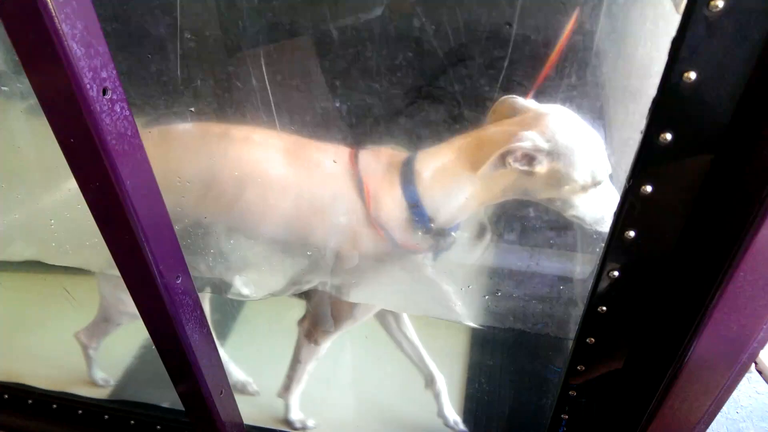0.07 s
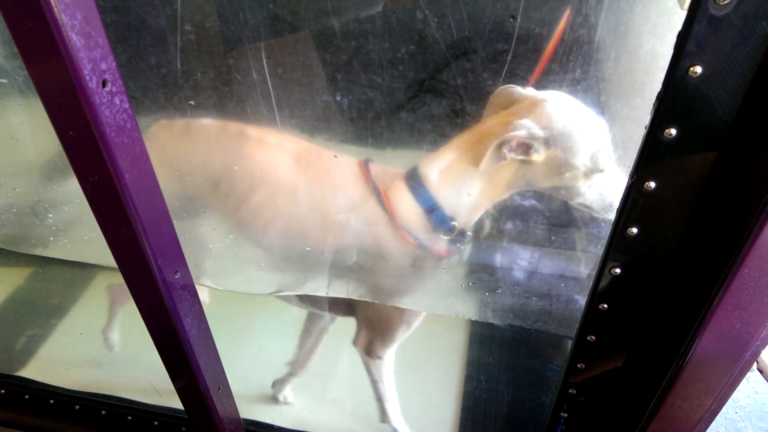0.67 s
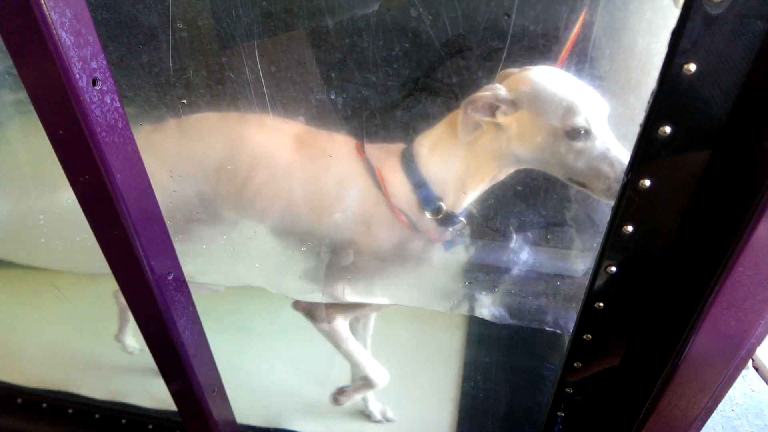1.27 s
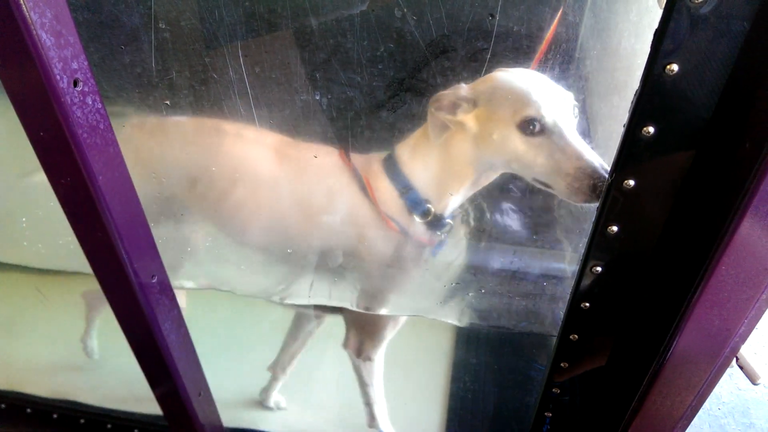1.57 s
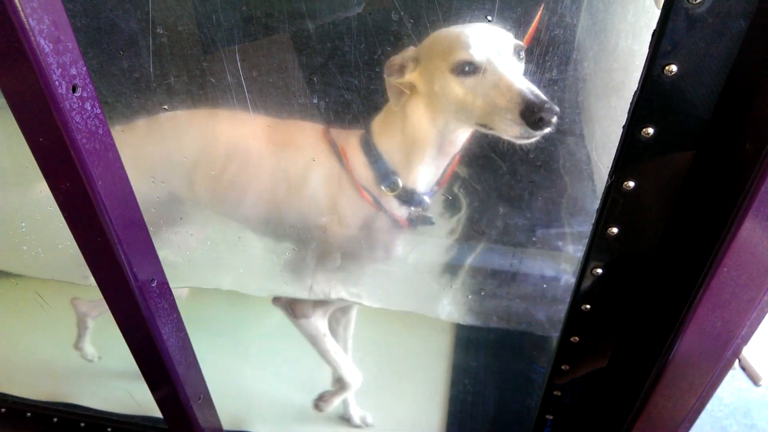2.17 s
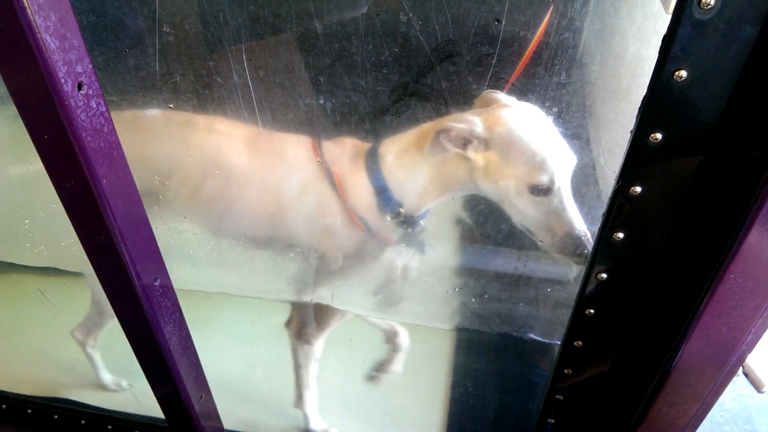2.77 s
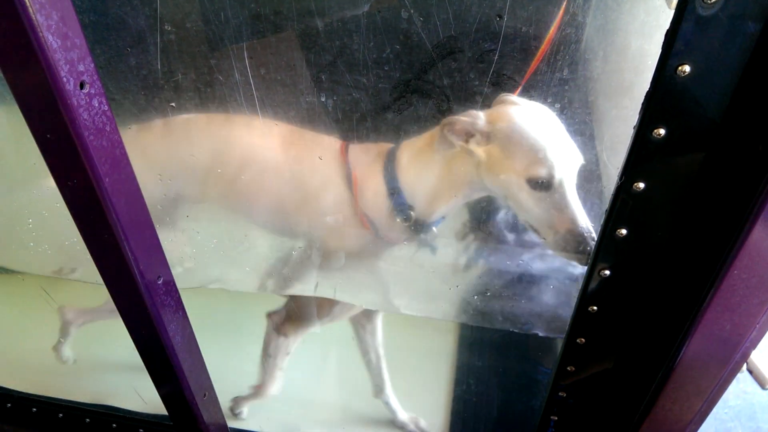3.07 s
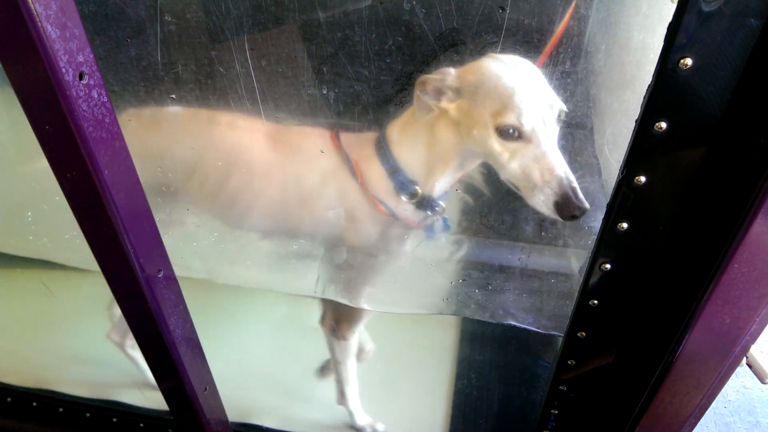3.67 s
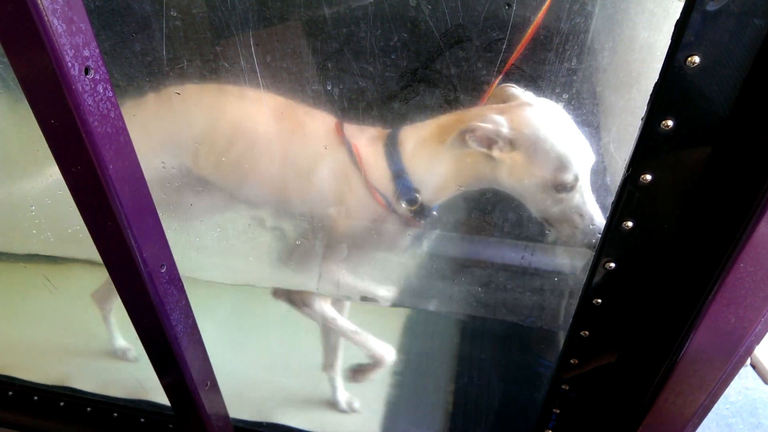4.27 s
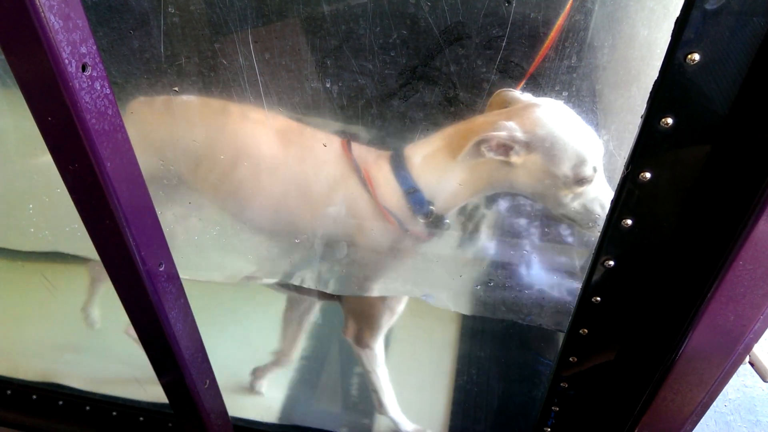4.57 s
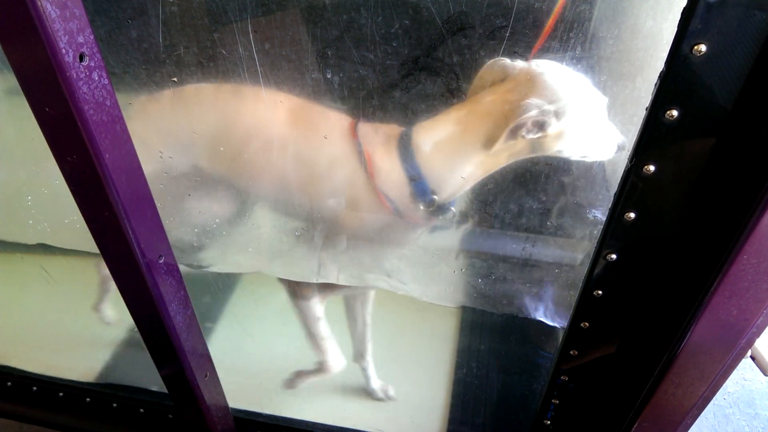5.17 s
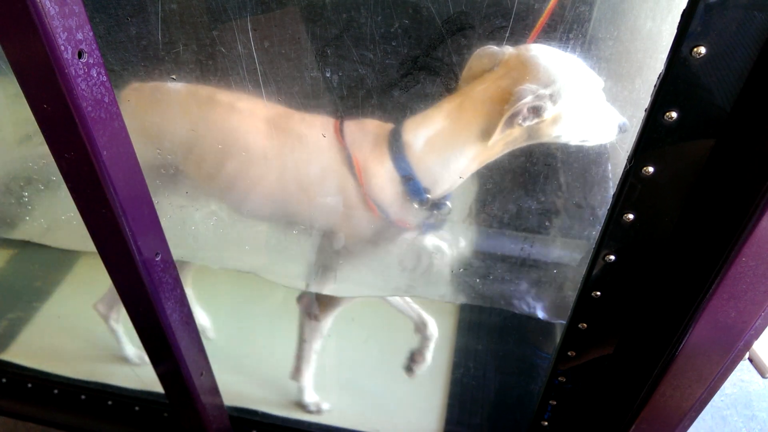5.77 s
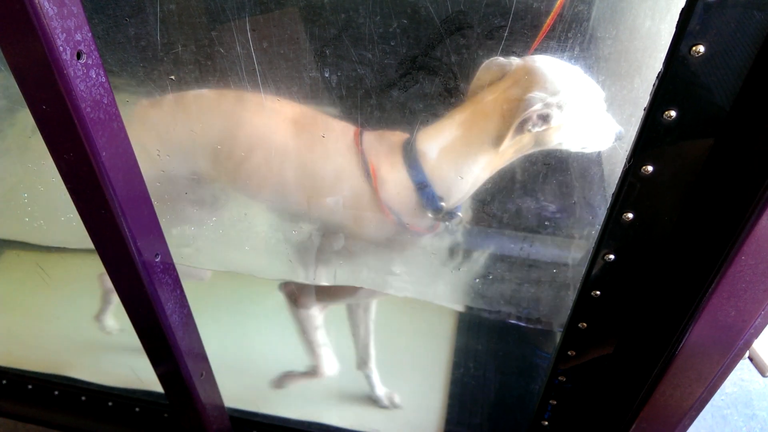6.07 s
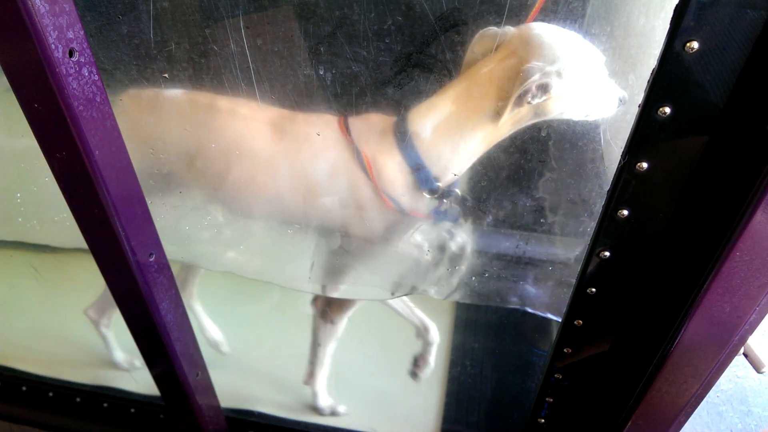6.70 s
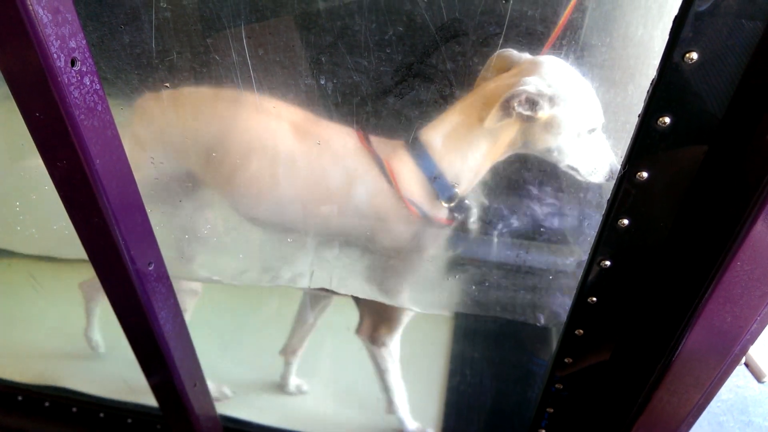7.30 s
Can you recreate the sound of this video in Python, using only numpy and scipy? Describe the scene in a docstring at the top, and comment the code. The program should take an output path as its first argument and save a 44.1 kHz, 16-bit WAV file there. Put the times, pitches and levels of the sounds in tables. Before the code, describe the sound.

A dog's underwater treadmill runs in a hard-walled room. A steady low motor and pump hum fades in with an even, hissing rush of circulating water and a faint high whine. The belt rubs on its roller in a low growl, three to four times a second. Moving air buffets the close microphone with irregular low bumps, mostly on the left. Two very faint splashes come near the end.

```python
"""A hum of motor and pump over an even rush of circulating water fades in together: a small dog's underwater
treadmill, running in a hard-walled room. Each shaft sounds harmonics of its rotation rate, and the geared-down
roller growls once a turn as the belt drags on it. Moving air buffets each microphone port on its own, with low
bumps. Two faint splashes come near the end."""
import sys
import numpy as np
from scipy import signal
from scipy.fft import rfft, irfft
from scipy.io import wavfile

SR = 44100
rng = np.random.default_rng(int(sys.argv[2]) if len(sys.argv) > 2 else 0)


def materialize(psi):
    """Save the field psi as 16-bit PCM at rate SR to the path in sys.argv[1].

    A 1-D psi becomes a single channel; in a 2-D psi each row is a channel.
    """
    bounded = np.clip(np.atleast_2d(psi).T, -1, 1)
    quanta = np.round(bounded * 32767).astype(np.int16)
    wavfile.write(sys.argv[1], SR, quanta)


N = 332514
TIME = np.arange(N) / SR
BIN_HZ = np.maximum(np.arange(N // 2 + 1) * SR / N, 1)

# Hum of the drive motor and of the pump; levels in all tables are relative. Each row: multiple of
# the shaft rate, level in dB, left minus right in dB, phase lead of the left in radians.
MOTOR_HARMONICS = [(6, -48, 2, 0), (12, -55, -3, -0.5), (15, -49.5, -2, 0.53), (20, -57.5, -5, 1.5),
                   (21, -55.5, -6, -2), (24, -62, -22.5, 2), (27, -59, -8, -1), (30, -59.5, -6, 2.5),
                   (45, -66, -8, 4.5), (54, -71, -19, 0)]
PUMP_HARMONICS = [(4, -42, -3, 0.16), (5, -58.5, -9, .3), (7, -52, -2, 1.2), (8, -55, 0, 1.5),
                  (9, -53.5, -1.5, 1), (11, -71, 4, 0.89), (16, -61, -5, 2.7)]
# Tones of the motor and its controller. Each row: frequency in Hz, level in dB, left minus right in dB.
WHINE_TONES = [(530, -55, -3), (3945, -62, -5), (14018, -76, -8), (14411, -73, -8), (14804, -77, -8)]
# Noise spectra of machine, water, belt and air. Each row: frequency in Hz, spectral density in dB.
RUMBLE_SPECTRUM = [(40, -11.5), (80, -4.5), (146, -2.5), (161, 3.5), (195, -20), (265, -6), (310, -3.5),
                   (390, -8), (460, -4.5), (620, -14.5), (820, -19), (995, -11.5), (1055, -26), (1170, -20),
                   (1500, -43)]
RUSH_SPECTRUM = [(40, -7), (150, -14), (400, -15), (750, -6.5), (1150, 3), (1500, -2), (2700, -1.5),
                 (3800, -6), (5800, -5.5), (6300, -10), (7300, -11.5), (8700, -18.5), (12500, -17),
                 (15500, -23)]
RUB_SPECTRUM = [(130, -33), (190, -4.5), (250, -1.5), (310, 4), (380, 4.5), (460, -3.5), (560, -9),
                (900, -12.5), (1200, -13.5), (2000, -45)]
BUFFET_SPECTRUM = [(12, -32), (25, -17), (45, -4.5), (80, 2), (135, -2), (200, -6.5), (300, -12),
                   (450, -19), (700, -26), (1500, -77)]
# Narrow resonances of the flow. Each row: centre in Hz, width in Hz, first level in dB, last level in dB.
FLOW_RESONANCES = [(4220, 30, -67, -67), (4430, 35, -62, -63), (4870, 25, -65, -66), (4965, 60, -64, -64),
                   (5078, 65, -57, -59.5), (5185, 25, -66, -66), (5300, 25, -63.5, -64.5),
                   (5640, 80, -58, -62.5), (5730, 95, -55, -61), (5850, 70, -64, -69),
                   (6610, 60, -64, -65.5), (6820, 45, -68, -69), (7065, 40, -64.5, -66.5),
                   (7250, 130, -61.5, -63.5), (7784, 60, -68, -70), (8230, 200, -68, -69),
                   (11990, 100, -72, -72)]
# The belt's drag, once a turn. Each row: time in seconds, strength in dB, pitch of the growl in Hz.
BELT_DRAGS = [(.04, -2, 150), (.328, -2, 141.2), (.596, -0.5, 155.1), (.89, 0, 142.4), (1.146, -0.5, 157),
              (1.434, -2, 161.6), (1.69, -1.5, 139.4), (1.983, -0.5, 155), (2.263, 0, 145.3),
              (2.525, 1.5, 151), (2.812, -0.5, 145.8), (3.072, -1, 151.8), (3.38, .5, 153.4),
              (3.624, 0, 149), (3.923, 2, 150.3), (4.201, -2, 139.6), (4.478, 0, 156), (4.758, -4, 137.3),
              (5.031, 0.5, 153.3), (5.33, 2, 150), (5.577, 1, 153), (5.864, .5, 154), (6.15, -1.5, 142.3),
              (6.416, 1, 154), (6.706, -1, 142.7), (6.965, 3.5, 158.2), (7.249, 1, 154.3), (7.535, -3, 145)]
# The growl's first three harmonics. Each row: peak level in dB, delay after the drag in turns,
# half-width in turns, dB gained per Hz of pitch.
GROWL_HARMONICS = [(-32.5, -0.025, 0.19, 0.17), (-33, 0.022, 0.15, -0.14), (-44, .03, 0.15, 0)]
# Gusts on the ports. Each row: centre in seconds, half-length in seconds, left and right levels in dB.
AIR_GUSTS = [(0.985, 0.037, -31, -36), (1.275, 0.028, -32, -46), (1.726, 0.12, -33.5, -43),
             (2.474, 0.12, -29.5, -38), (2.79, 0.05, -25, -30), (3.044, 0.035, -29.5, -28),
             (3.357, 0.029, -26.5, -34), (4.44, 0.03, -26, -34), (4.694, .11, -33, -34),
             (5.32, 0.11, -30, -33), (5.696, .018, -24, -43), (5.951, 0.086, -27.5, -35),
             (6.124, 0.08, -35.5, -33), (6.557, 0.05, -32, -41), (6.66, 0.045, -31.5, -30),
             (6.95, 0.082, -31.5, -36), (7.186, 0.16, -44, -34), (7.483, 0.042, -36, -33)]
# Low bumps of air. Each row: centre in seconds, level in dB, pitch in Hz, length in cycles,
# share in the right port from 0 to 1.
AIR_BUMPS = [(0.344, -22, 130, 1.5, 0), (0.893, -17.5, 181, 0.97, 0.03), (0.999, -16, 150, 1, 0),
             (1.238, -18, 190, .6, 0.03), (1.422, -15, 145, 0.51, 0.24), (1.65, -13, 148.1, 1.1, 0.09),
             (1.733, -13, 270, 0.4, 0), (1.786, -9.5, 190, 0.47, 0), (1.849, -12.5, 135, 0.69, 0.2),
             (2.222, -16, 150, .9, 0.02), (2.411, -15, 124, 0.82, 0), (2.518, -16, 216, 0.62, 0),
             (2.718, -12, 120, 0.42, 0), (2.794, -14.5, 207, 1.2, 0.9), (2.825, -8, 165, 0.46, 0),
             (2.858, -9.5, 210, .8, 0), (2.869, -0.5, 144, 0.82, 0.04), (3.05, -14, 129, 1.103, 0.2),
             (3.384, -15, 186.2, 0.53, 0), (4.039, -10, 115, 0.78, 0.04), (4.283, -12.5, 86.5, 0.62, 0),
             (4.44, -13, 165, 1.9, 0.2), (4.454, -9, 197.9, 0.34, 0), (5.082, -11, 151, 0.75, 0),
             (5.264, -7, 280, 0.55, 0), (5.312, -11, 157, 0.94, 0), (5.68, -13, 194.4, 0.45, 0),
             (5.692, -5.5, 116, 0.36, 0), (5.933, -11.5, 140, 1.1, 0), (5.987, -17, 215, 0.55, 0.1),
             (6.081, -11, 148, 0.83, 0.1), (6.204, -13.5, 135, 0.72, 1), (6.491, -9.5, 124, 0.72, 0),
             (6.653, -15.5, 140.9, 0.89, 0.98), (6.936, -10, 127.4, 0.56, 0.1), (6.984, -27, 120, 1.1, 0),
             (7.206, -13, 130, 0.79, 0.7), (7.272, -12.5, 193.8, 0.74, .7)]
# Spray at the water line. Each row: time in seconds, band centre in Hz, bandwidth in Hz,
# half-length in seconds, level in dB.
SPRAY_PUFFS = [(6.53, 4600, 1800, .04, -46), (7.203, 9850, 400, .016, -54)]
# Response of the muffled left port. Each row: frequency in Hz, gain against the right port in dB.
LEFT_PORT_RESPONSE = [(300, -0.5), (800, 0.5), (1200, -2.5), (1900, -0.5), (2400, -3.5), (2900, -3.5),
                      (3600, -3.5), (4500, -7.5), (5200, -15.5), (5800, -22), (6200, -33), (7200, -22),
                      (9500, -14), (12000, -19.5), (13500, -20), (15000, -35)]


def from_db(db):
    """Amplitude grows tenfold for every 20 dB."""
    return 10 ** (np.asarray(db) / 20)


def unit_rms(x):
    """Division by the root mean square gives unit power."""
    return x / np.sqrt(np.mean(x ** 2) + 1e-20)


def colour(x, spectrum):
    """Filtering multiplies the spectrum by a gain curve, here drawn through (Hz, dB) points."""
    hz, db = np.transpose(spectrum)
    return irfft(rfft(x) * from_db(np.interp(np.log(BIN_HZ), np.log(hz), db)), N)


def noise(spectrum, channels):
    """Filtered white noise of unit power, incoherent between channels."""
    return unit_rms(colour(rng.standard_normal((channels, N)), spectrum))


def drift(rate_hz):
    """A slow fluctuation of unit power: random values joined by straight lines."""
    return unit_rms(np.interp(TIME * rate_hz, np.arange(1024), rng.standard_normal(1024)))


def panned(db):
    """A level difference, split evenly between left and right, places a source to one side."""
    return from_db(np.array([[db / 2], [-db / 2]]))


def swell(turn, at, width):
    """A periodic envelope: one Gaussian hump of unit height per turn."""
    return np.exp(-(((turn - at + .5) % 1 - .5) / width) ** 2)


def shaft_hum(shaft_hz, harmonics, wander, waver_db):
    """Rotation radiates harmonics of the shaft rate; the room gives each its own side and phase."""
    angle = 2 * np.pi * np.cumsum(shaft_hz * (1 + wander * drift(7))) / SR
    hum = np.zeros((2, N))
    for multiple, db, pan_db, lead in harmonics:
        phase = multiple * angle + rng.uniform(0, 2 * np.pi) + np.array([[lead], [0]])
        amplitude = np.sqrt(2) * from_db(db + waver_db * drift(9))
        hum += amplitude * panned(pan_db) * np.sin(phase)
    return hum


def machine_rumble():
    """Irregular vibration of the machine radiates a continuous spectrum of low noise."""
    return from_db(-37.5) * noise(RUMBLE_SPECTRUM, channels=1)


def water_rush(flutter_db, direct_db, ripple_db, left_lead_s=.000272):
    """Flow noise arrives as a diffuse field plus a weaker direct wave that reaches the left port first."""
    direct = noise(RUSH_SPECTRUM, channels=1)[0]
    early = irfft(rfft(direct) * np.exp(2j * np.pi * BIN_HZ * left_lead_s), N)
    hiss = noise(RUSH_SPECTRUM, channels=2) + from_db(direct_db) * np.array([early, direct])
    # Faint resonances: a random gain about every 25 Hz, reaching full depth at 5 kHz.
    ripple = np.interp(BIN_HZ / 25.02, np.arange(1024), rng.standard_normal(1024))
    depth_db = ripple_db * np.minimum(BIN_HZ / 5000, 1)
    hiss = unit_rms(irfft(rfft(hiss) * from_db(depth_db * ripple), N))
    return from_db(-37 + flutter_db * drift(22)) * hiss


def flow_whistles():
    """Resonances select narrow bands of the flow noise; most of them slowly weaken."""
    power = 0
    for hz, width, first_db, last_db in FLOW_RESONANCES:
        peak = 1 / (1 + (2 * (BIN_HZ - hz) / width) ** 2) ** 2
        power = power + from_db([[first_db], [last_db]]) ** 2 * peak / peak.mean()
    flow = rfft(rng.standard_normal((2, N)))
    first, last = (irfft(flow * np.sqrt(p), N) for p in power)
    return from_db(4) * (first + (last - first) * TIME / TIME[-1])


def drive_whine(wander_hz=0.74):
    """The electric drive vibrates at nearly constant frequencies, each heard as a pure tone."""
    whine = np.zeros((2, N))
    for hz, db, pan_db in WHINE_TONES:
        phase = 2 * np.pi * np.cumsum(hz + wander_hz * drift(2.01)) / SR
        whine += np.sqrt(2) * from_db(db) * panned(pan_db) * np.sin(phase)
    return whine


def roller_growl(free_hz, catch_share, jitter, uneven_db, pan_db):
    """Periodic friction: once a turn the belt drags, lifting the pitch and adding overtones and a rub."""
    times, drag_db, drag_hz = np.transpose(BELT_DRAGS)
    turn = np.interp(TIME, times, np.arange(len(times)))
    nearest = np.round(turn).astype(int)
    load = from_db(drag_db[nearest] + uneven_db * drift(12))
    rise_hz = drag_hz[nearest] - free_hz
    # The pitch jumps as the belt catches, then settles on that turn's value.
    catch = catch_share * swell(turn, at=-0.18, width=.11)
    pitch = free_hz + rise_hz * (catch + swell(turn, at=0.045, width=.32))
    angle = 2 * np.pi * np.cumsum(pitch * (1 + jitter * drift(27.4))) / SR
    tone = from_db(-36.5) * swell(turn, at=0.52, width=0.22) * np.sin(angle)  # free hum between drags
    for multiple, (db, at, width, db_per_hz) in enumerate(GROWL_HARMONICS, 1):
        level = from_db(db + db_per_hz * (rise_hz - rise_hz.mean()))
        tone += level * load * swell(turn, at, width) * np.sin(multiple * angle)
    rub_envelope = from_db(-37.5) * load * swell(turn, at=-0.073, width=0.21)
    return panned(pan_db) * (np.sqrt(2) * tone + rub_envelope * noise(RUB_SPECTRUM, channels=1))


def air_buffeting(lumpy_db, wander_db):
    """Turbulent eddies strike each port separately; the powers of gusts and a light draught add."""
    draught_db = np.array([[-37], [-39]]) + wander_db * np.array([drift(13), drift(9.2)])
    power = from_db(draught_db) ** 2
    for centre, half_length, left_db, right_db in AIR_GUSTS:
        gust = np.exp(-.5 * ((TIME - centre) / half_length) ** 2)
        power += (from_db([[left_db], [right_db]]) * gust) ** 2
    lumps = unit_rms(from_db(lumpy_db * np.array([drift(37), drift(25)])))
    return from_db(3.5) * np.sqrt(power) * lumps * noise(BUFFET_SPECTRUM, channels=2)


def air_bumps(snap_db, snap_s, snap_growth, snap_lead_cycles):
    """Each pressure pulse is a spike between smaller swings; the stronger it is, the steeper its front."""
    bumps = np.zeros((2, N))
    for centre, db, hz, cycles, right_share in AIR_BUMPS:
        near = np.abs(TIME - centre) < .05
        t = TIME[near] - centre
        swing = np.cos(2 * np.pi * hz * t) / np.cosh(2 * hz * t / cycles)
        edge = (t + snap_lead_cycles / hz) / snap_s
        snap = from_db(snap_db + snap_growth * db) * edge * np.exp(-edge ** 2)
        bumps[:, near] -= from_db(db) * (swing + snap) * np.array([[1 - right_share], [right_share]])
    return bumps


def splashes():
    """Spray radiates soft bursts of band-limited noise, Gaussian in time and in frequency."""
    spray = rfft(rng.standard_normal(N))
    puffs = np.zeros(N)
    for centre, hz, width, half_length, db in SPRAY_PUFFS:
        band = unit_rms(irfft(spray * np.exp(-(2 * (BIN_HZ - hz) / width) ** 2), N))
        puffs += from_db(db) * np.exp(-((TIME - centre) / half_length) ** 2) * band
    return puffs


def scene():
    """Pressures superpose; water, whine, rumble and roller are muffled at the left port."""
    motor = shaft_hum(36.04, MOTOR_HARMONICS, wander=0.003067, waver_db=2.5)
    pump = shaft_hum(72.4, PUMP_HARMONICS, wander=0.00512, waver_db=3.3)
    rumble = machine_rumble()
    water = water_rush(flutter_db=0.4, direct_db=-7.0, ripple_db=3.0) + flow_whistles() + splashes()
    whine = drive_whine()
    roller = roller_growl(free_hz=136.2, catch_share=.75, jitter=0.0179, uneven_db=0.2, pan_db=-1.5)
    air = air_buffeting(lumpy_db=2.5, wander_db=3.0)
    bumps = air_bumps(snap_db=-1, snap_s=.00056, snap_growth=.55, snap_lead_cycles=.16)
    left, right = rumble + water + whine + roller
    return np.array([colour(left, LEFT_PORT_RESPONSE), right]) + motor + pump + air + bumps


def record(dry):
    """A linear ramp fades the sound in, and a steep low-pass filter removes the highest treble."""
    fade_start_s, fade_s, cutoff_hz = 0.068, 0.29, 15750
    fade = np.clip((TIME - fade_start_s) / fade_s, 0, 1)
    lowpass = signal.ellip(12, .1, 80, cutoff_hz, fs=SR, output="sos")
    return signal.sosfilt(lowpass, dry * fade * from_db(-1.5))


dry = scene()
out = record(dry)
materialize(out)
```